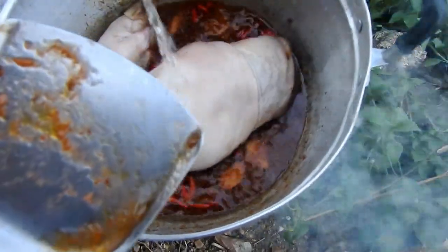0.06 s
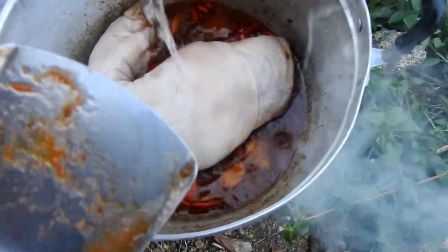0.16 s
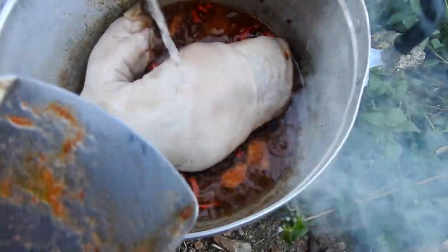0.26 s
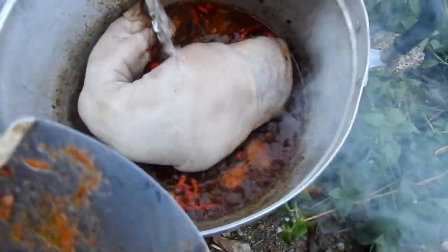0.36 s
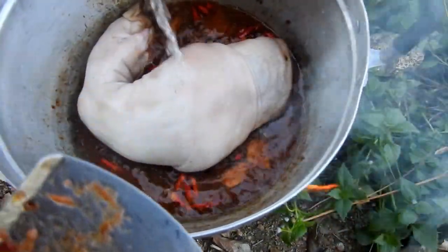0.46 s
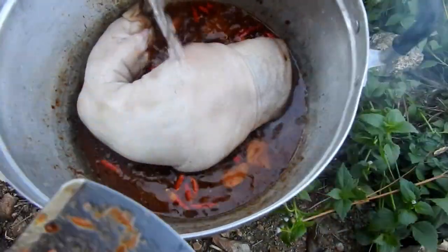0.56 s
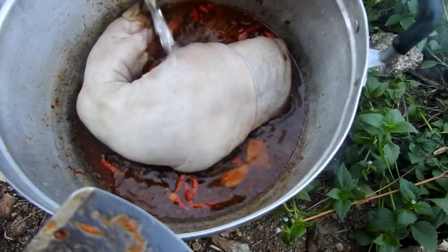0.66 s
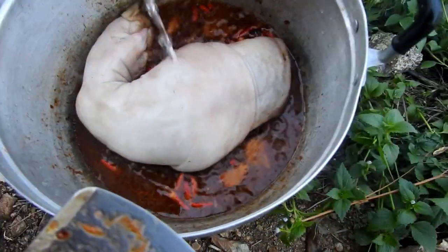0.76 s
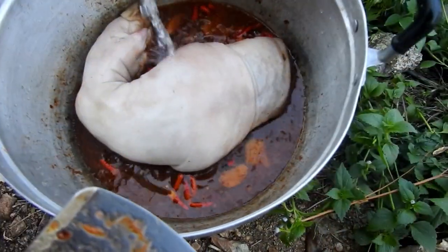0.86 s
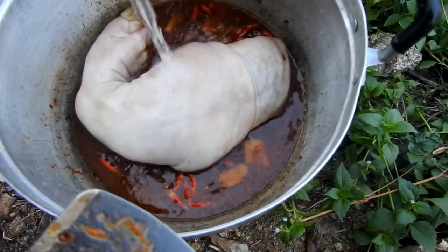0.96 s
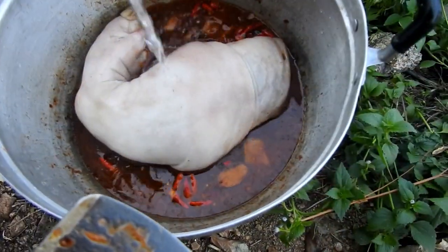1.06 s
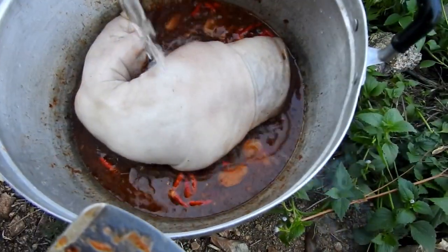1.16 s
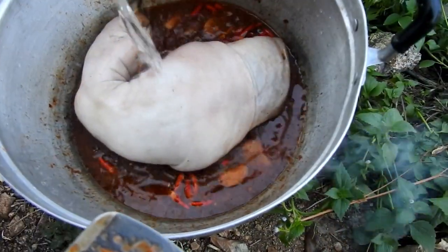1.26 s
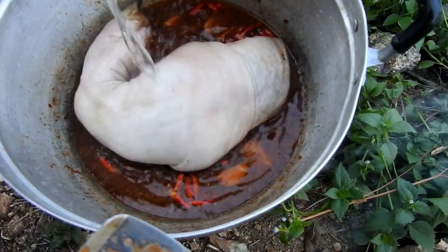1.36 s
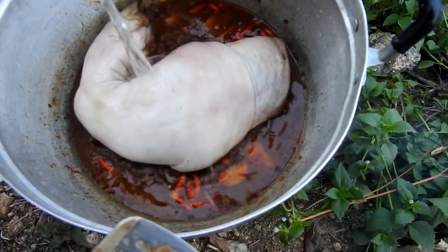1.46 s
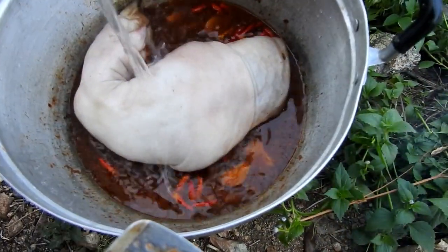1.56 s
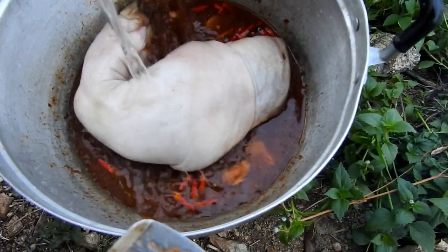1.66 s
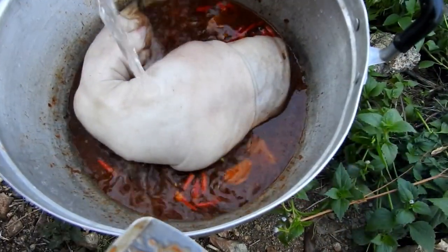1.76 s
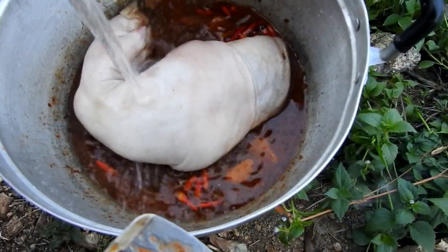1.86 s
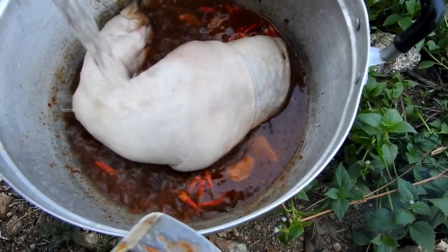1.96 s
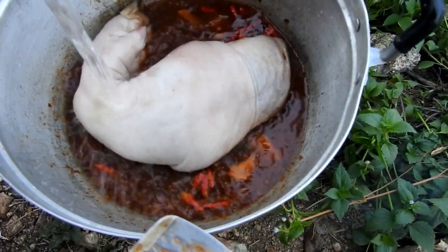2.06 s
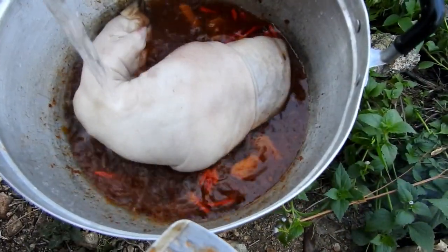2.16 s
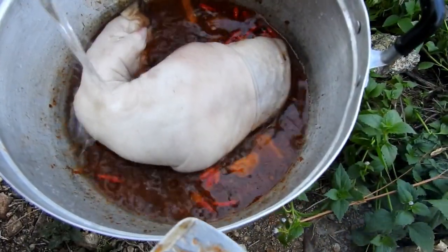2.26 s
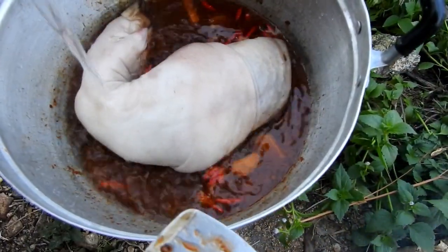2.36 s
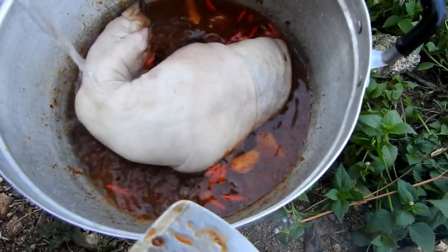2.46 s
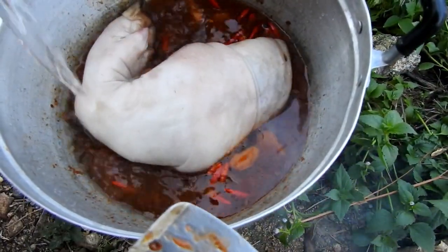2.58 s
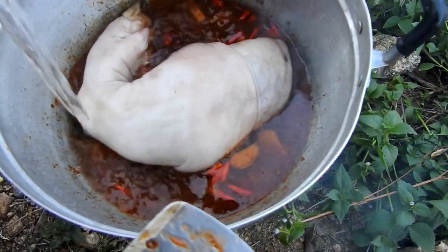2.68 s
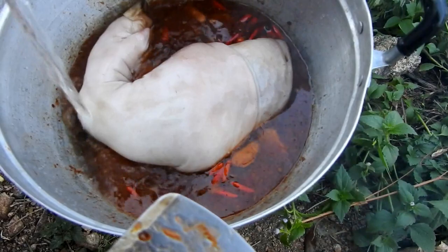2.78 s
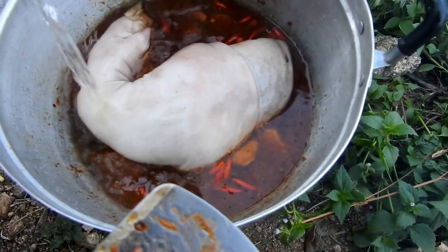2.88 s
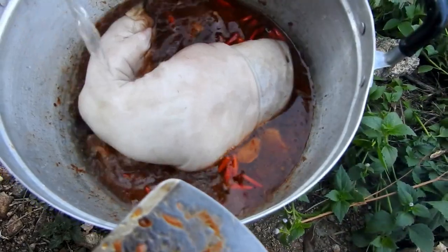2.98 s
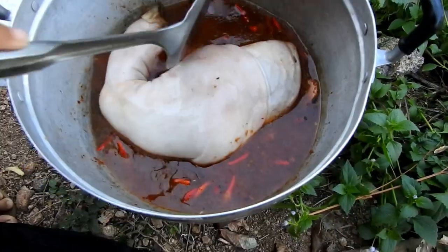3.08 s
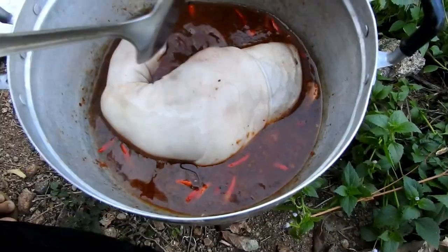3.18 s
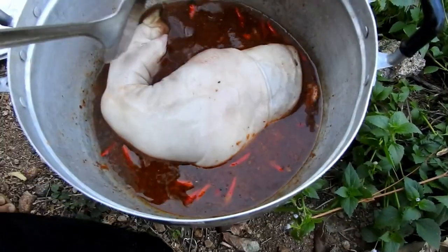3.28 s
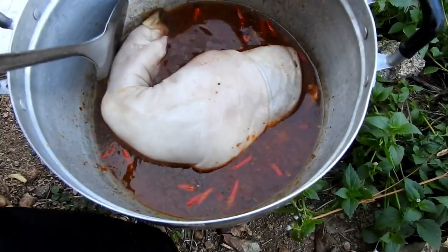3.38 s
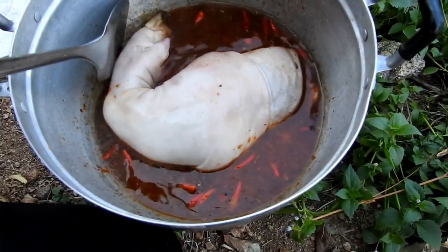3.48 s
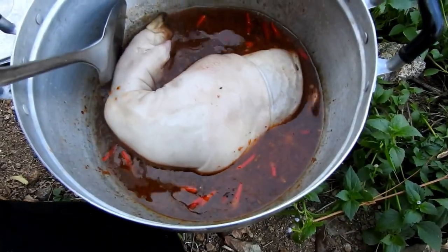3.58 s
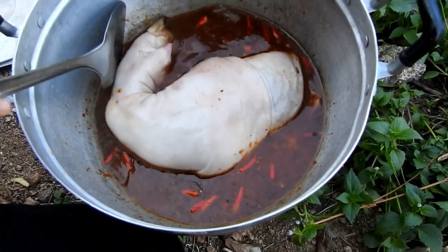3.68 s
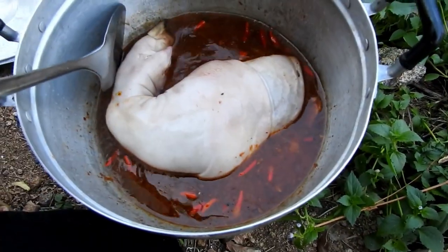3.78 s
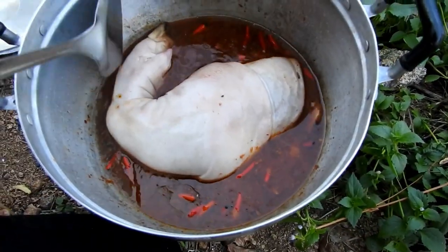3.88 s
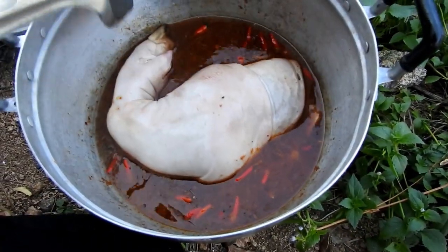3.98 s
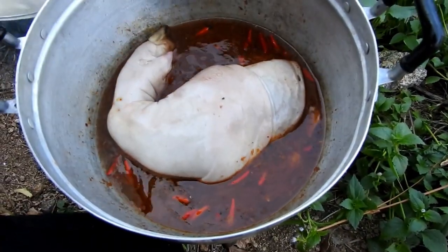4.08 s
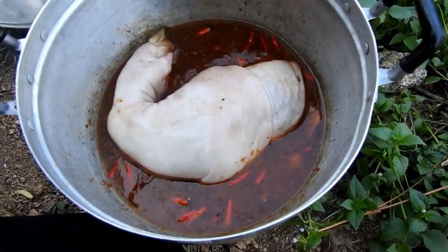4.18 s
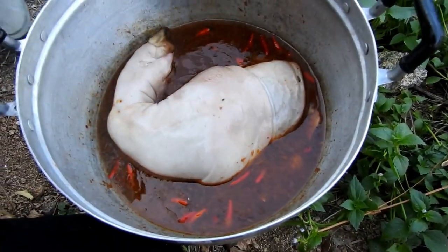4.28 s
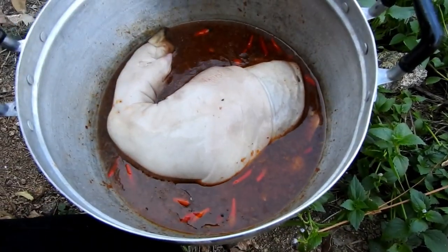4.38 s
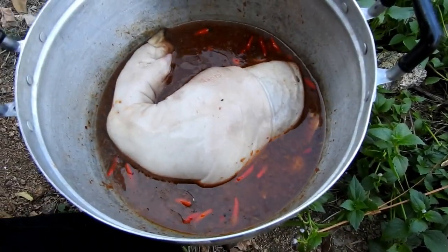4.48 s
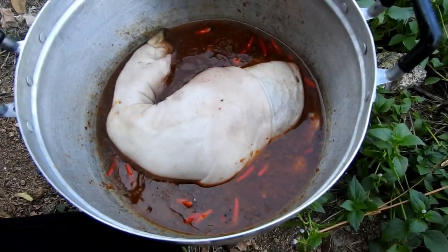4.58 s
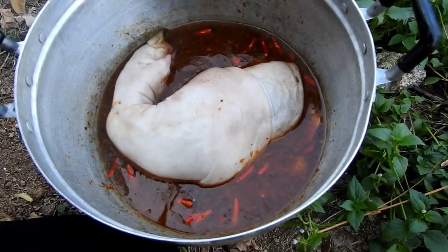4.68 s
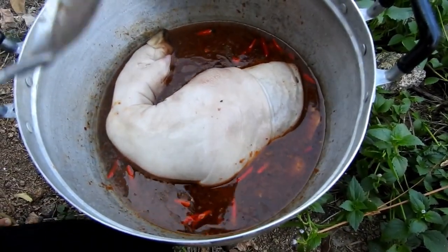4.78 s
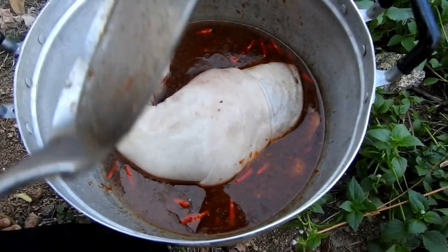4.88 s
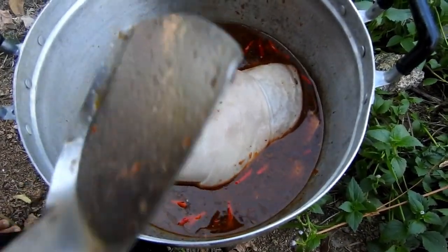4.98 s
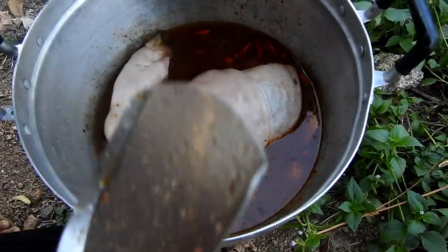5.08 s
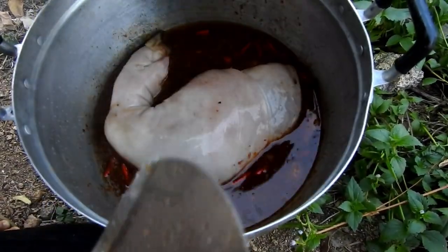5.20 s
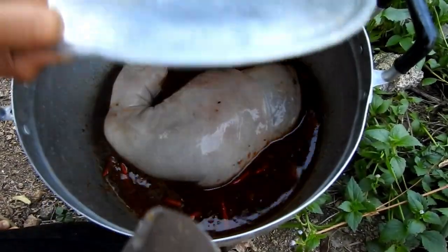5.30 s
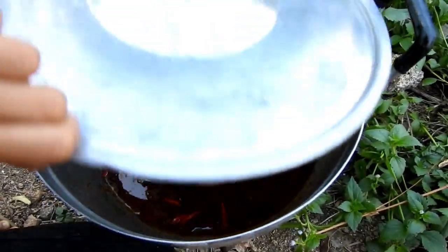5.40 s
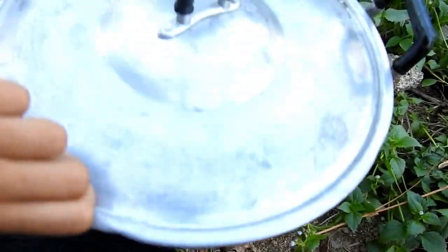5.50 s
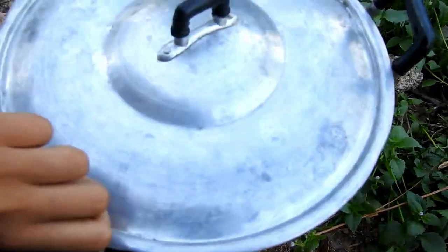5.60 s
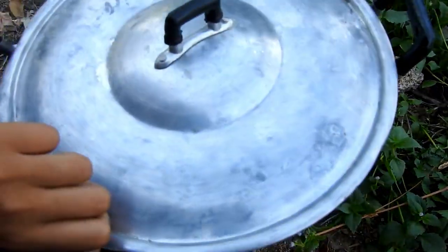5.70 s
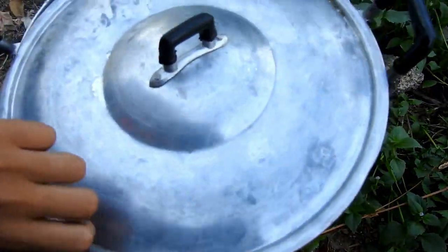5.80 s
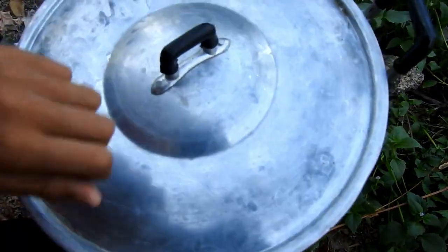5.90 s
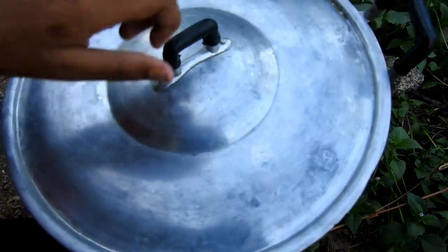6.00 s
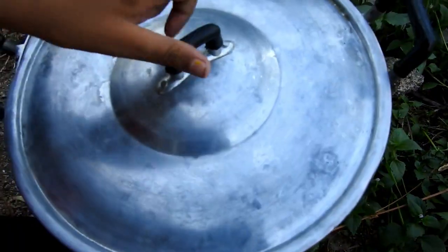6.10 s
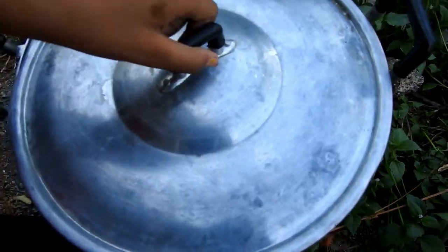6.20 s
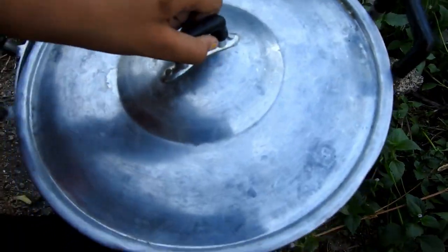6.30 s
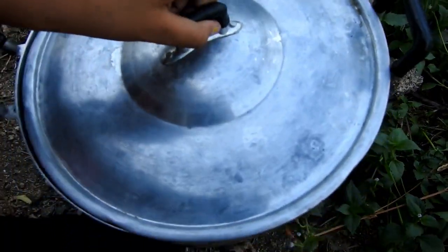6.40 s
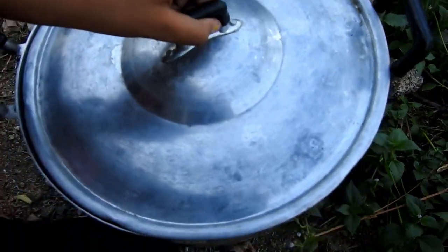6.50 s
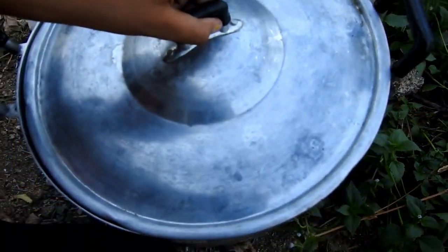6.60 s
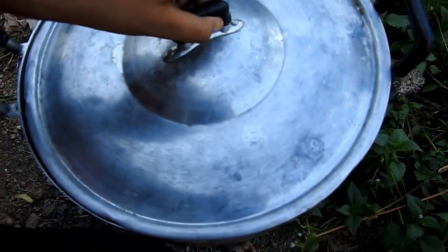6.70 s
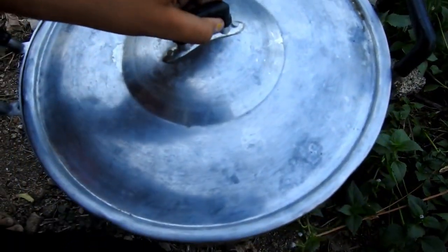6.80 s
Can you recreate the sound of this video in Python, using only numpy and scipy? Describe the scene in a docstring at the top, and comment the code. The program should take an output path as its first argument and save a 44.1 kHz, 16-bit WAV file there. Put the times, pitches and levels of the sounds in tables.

```python
"""First one hears a thin stream of water poured over meat into a big aluminium pot of broth, swelling to a splash.
After a short silence a metal spoon clinks and scrapes on the pot wall, then the lid drops on and slides into place.
Something like a distant engine throbs under a soft hiss and a few faint bird whistles.
Water is a crowd of short rising tones, one per bubble; metal is clicks and noise that set decaying modes ringing;
the engine is a row of bass puffs, the hiss is shaped noise and the whistles are gliding sine tones."""
import sys
import numpy as np
from scipy import signal
from scipy.fft import rfft, irfft, next_fast_len
from scipy.io import wavfile
from scipy.ndimage import uniform_filter1d

SR = 44100
rng = np.random.default_rng(int(sys.argv[2]) if len(sys.argv) > 2 else 0)


def file_out(sig):
    """Save sig as 16-bit WAV at sys.argv[1]."""
    # one column per channel
    cols = np.atleast_2d(sig).T
    # limit, then scale
    lim = np.clip(cols, -1, 1)
    pcm = np.round(lim * 32767).astype(np.int16)
    wavfile.write(sys.argv[1], SR, pcm)


N = 302085
TIME = np.arange(N) / SR  # seconds

# the short silence after the splash: start_s, end_s
MUTED_S = (2.856, 3.103)
# tones in which the pot rings: pitch_hz, level_db, t60_s (time to fade by 60 dB)
POT_MODES = [(386, 1.5, 0.11), (840, -4.5, 0.12), (974, -13, 0.16), (1237, 3.5, 0.092), (1508, -8.5, 0.1),
             (2120, 0.5, 0.074), (2520, -5.5, 0.085), (2820, 0.5, 0.051), (3240, 4, 0.031),
             (4000, -7, 0.18), (4250, -21, 0.072), (4840, -14, .08)]
# low tones in which the lid booms: pitch_hz, level_db, t60_s
LID_BOOM_MODES = [(278, -9.5, 0.078), (313.7, -1.5, 0.14), (350, -2, 0.018)]
# higher tones in which the lid rings: pitch_hz, level_db, t60_s
LID_MODES = [(463, -3.5, 0.2), (510, 0, 0.1), (552, -9.5, 0.42), (635, -8, 0.027), (808, -4, 0.2),
             (949, 7.5, 0.083), (998, -4, 0.63), (1015, -2, 0.27), (1203, -8.5, 0.5), (1294, -17, 0.9),
             (1377, -6.5, 0.43), (1516, 4.5, 0.079), (1515, -17, 0.083), (1610, -30, 0.41),
             (1694, -15.5, 0.37), (1944, -8, 0.26), (2280, -15, 0.079), (2710, -13, 0.21),
             (2990, -36.5, .12), (3630, -9, 0.11), (4400, -19, 0.17)]
# the lid hits the rim: start_s, blow_db, hardness_db (hard contact trades thud for clank)
LID_BLOWS = [(5.214, -7.5, 6.5), (5.29, -10.5, 5.5), (5.382, -25, 21.5), (5.508, -12, -4.5),
             (5.58, -20.5, -8.5), (5.667, -20, -7.5), (5.678, -22.5, -6.5), (5.792, -10, 1),
             (5.808, -12, -1), (5.872, -8.5, 5.5), (5.91, -16, 9.5), (5.983, -18, 4), (6.021, -13, 3.5),
             (6.129, -13, 5), (6.223, -9.5, 2.5), (6.272, -10.5, 4.5), (6.398, -9.5, 0), (6.429, -18, -2),
             (6.477, -15, -1)]


def from_db(db):
    """Turn decibels into a factor."""
    return 10 ** (np.asarray(db) / 20)


def rms_one(x):
    """Scale a sound to an average (rms) level of 1."""
    return x / np.sqrt(np.mean(x ** 2) + 1e-20)


def gains(rows):
    """Turn the level columns of a timed table into factors over time."""
    s, *columns = np.transpose(rows)
    return [from_db(np.interp(TIME, s, column)) for column in columns]


def band(x, low_hz, high_hz, order=2):
    """Keep only the pitches between two limits."""
    limits = [low_hz, min(high_hz, .45 * SR)]
    return signal.sosfilt(signal.butter(order, limits, "band", fs=SR, output="sos"), x + 1e-18)


def colour(x, spectrum):
    """Make each pitch louder or softer along a smooth curve of (Hz, dB) points."""
    size = next_fast_len(x.shape[-1])
    hz, db = np.transpose(spectrum)
    bins = np.maximum(np.fft.rfftfreq(size, 1 / SR), 1)
    curve = from_db(np.interp(np.log(bins), np.log(hz), db))
    return irfft(rfft(x, size) * curve, size)[..., :x.shape[-1]]


def stereo(pair):
    """Turn a middle and a side sound into left and right; the treble is wider than the bass."""
    # side against middle: pitch_hz, level_db
    width = [(30, -14), (70, -31), (120, -21.5), (320, -20.5), (600, -17.5), (1100, -12), (2500, -10),
             (5000, -8), (12000, -2.5)]
    middle, side = pair
    return middle + colour(side, width) * [[1], [-1]]


def add(out, s, sound):
    """Mix a sound in from a given second on."""
    at = max(int(s * SR), 0)
    out[:, at:at + sound.shape[-1]] += sound[..., :max(N - at, 0)]


def steady(x, window_s):
    """Even out the slow level to about rms 1, keeping the grain."""
    power = uniform_filter1d(x ** 2, max(int(window_s * SR), 1))
    power = uniform_filter1d(power, max(int(window_s * SR / 2), 1))
    return x / np.sqrt(np.abs(power) + 1e-12)


def during(start, end, ramp_s):
    """A switch that is open between start and end, with soft edges."""
    return np.clip(np.minimum(TIME - start, end - TIME) / ramp_s + .5, 0, 1)


def drift(per_s):
    """A random wandering of spread about 1; after 1000 points it holds its last value."""
    return np.interp(TIME * per_s, np.arange(1000), 1.2 * rng.standard_normal(1000))


def grains(per_s, spread_db):
    """Random clicks of uneven size as middle and side: each comes from a place of its own."""
    sizes = from_db(spread_db * np.minimum(rng.exponential(1, N), 4))
    happens = rng.random(N) < per_s / SR
    clicks = happens * sizes * rng.choice([-1, 1], N)
    return np.array([clicks, clicks * rng.standard_normal(N)])


def ring(x, modes):
    """Each click sets every mode ringing, like a struck metal body with its own set of fading tones."""
    out = 0
    for k, (hz, db, t60) in enumerate(modes):
        r = from_db(-60 / (t60 * SR))  # what is left after one sample
        w = 2 * np.pi * hz / SR
        tone = signal.lfilter([0, np.sin(w)], [1, -2 * r * np.cos(w), r * r], x + 1e-18)
        out = out + (-1) ** k * from_db(db) * tone  # neighbours start in opposite directions
    return out


def sheet(x, spectrum, t60, count=5):
    """Thin metal has countless high modes; as the contact moves, other ones answer with a short shimmer."""
    t = TIME[:SR // 6]
    out = 0.26 * x
    for place in range(count):
        tail = rng.standard_normal((2, len(t))) * from_db(-60 * t / t60)
        tail /= np.sqrt(np.sum(tail ** 2, axis=1, keepdims=True))
        near = np.maximum(np.cos(2 * np.pi * (TIME * 2.3 + place / count)), 0) ** 2
        out = out + signal.oaconvolve(x * near, tail, axes=1)[:, :N]
    return colour(out, spectrum)


def burst(low_hz, high_hz, t60, order=3):
    """A crowd of modes in one band, struck together: noise that dies away."""
    t = TIME[:SR // 4]
    fading = rng.standard_normal((2, len(t))) * from_db(-60 * t / t60)
    pair = band(fading, low_hz, high_hz, order)
    # middle and side each start at the same strength, taken over the first fortieth of a second
    return stereo(pair / np.std(pair[:, :SR // 40], axis=1, keepdims=True))


def late_treble(tick_db):
    """The delayed bright part of a blow: a sharp tick and a sizzle."""
    sizzle = burst(4580, 7130, t60=0.041)
    return sizzle + from_db(tick_db) * burst(3300, 8800, t60=0.011, order=2)


def sing(force, hz, t60, waver=.002):
    """Friction feeds one mode: it swells while rubbed and rings out afterwards."""
    r = from_db(-60 / (t60 * SR))
    swell = signal.lfilter([1 - r], [1, -r], force + 1e-18)
    turns = hz * np.cumsum(1 + waver * drift(70)) / SR
    return np.sqrt(2) * swell * np.sin(2 * np.pi * turns)


def from_left(x, lead_s, spread):
    """A source on the left reaches that microphone sooner and louder; spread keeps a share of its scatter."""
    # left over right: pitch_hz, level_db
    left_tilt = [(200, 0.5), (1300, 2), (2400, 4.5), (4400, 0.2), (8000, 1.6)]
    mid = x.mean(axis=0)
    left, right = mid + spread * (x - mid)
    size = next_fast_len(N + 64)
    delay = np.exp(-2j * np.pi * np.fft.rfftfreq(size, 1 / SR) * lead_s)
    late = irfft(rfft(right, size) * delay, size)[:N]
    louder = [(hz, db / 2) for hz, db in left_tilt]
    softer = [(hz, -db / 2) for hz, db in left_tilt]
    return np.array([colour(left, louder), colour(late, softer)])


def garden():
    """Soft outdoor hiss is shaped noise; each bird whistle is a sine that glides, swells and fades."""
    # colour of the hiss: pitch_hz, level_db
    air_spectrum = [(25, -24), (60, -1), (100, 3), (200, -6.5), (310, -11.5), (480, -12.5), (1000, -17),
                    (2000, -23.5), (3200, -23.5), (5000, -22.5), (6600, -17), (8000, -30), (10000, -43.5),
                    (16000, -57.5)]
    # bird whistles: start_s, length_s, start_hz, end_hz, level_db
    bird_whistles = [(3.27, 0.052, 2850, 3270, -42), (3.327, 0.16, 3470, 3300, -48),
                     (3.535, 0.072, 2400, 1850, -42.5), (4.05, 0.028, 3100, 3650, -41),
                     (4.993, 0.06, 2950, 3170, -40.5)]
    air = colour(rng.standard_normal((2, N)), air_spectrum)
    out = stereo(from_db(-38) * air / np.std(band(air[0], 170, 14000)))
    for s, length, start_hz, end_hz, db in bird_whistles:
        along = np.linspace(0, 1, int(length * SR))
        phase = 2 * np.pi * np.cumsum(start_hz * (end_hz / start_hz) ** along) / SR
        add(out, s, from_db(db) * np.sin(np.pi * along) * np.sin(phase))
    return out


def engine(per_s=27.2, jitter_s=0.0023, uneven_db=3.0, weak_db=-4.0):
    """A far engine idles: strong and weak puffs in turn, of which only the bass carries."""
    # loudness over time: start_s, level_db
    engine_level = [(0, -34), (1.5, -38), (3.0, -37), (4.6, -33), (6.0, -34.5), (6.85, -28.5)]
    puffs = np.zeros((2, N))
    for k, (late, size) in enumerate(rng.standard_normal((220, 2))):
        puff_db = size * uneven_db + weak_db * (k % 2)
        add(puffs, k / per_s + late * jitter_s, from_db([puff_db]))
    throb = ring(puffs, [(109.2, 5.2, 0.17), (160.2, 4.5, 0.083)])
    return gains(engine_level)[0] * rms_one(band(throb, 92, 206))


def pot_bumps():
    """A nudge makes the full pot thump and knock: two short bursts of low noise."""
    # soft bumps: start_s, level_db
    nudges = [(0.682, -35.5), (3.767, -26.5), (3.826, -27.5)]
    out = np.zeros((2, N))
    for s, db in nudges:
        thump = burst(236, 444, t60=0.14)
        knock = from_db(-4.5) * burst(340, 1370, t60=0.063)
        add(out, s, from_db(db) * (thump + knock))
    return out


def spoon_clinks(delay_s=0.025, clank_follows=1.41):
    """Each tap cracks, thuds and rings the pot, clanking more when hard; it starts dull, its sizzle follows."""
    # the spoon taps the pot: start_s, blow_db, sizzle_db
    taps = [(3.118, -40.5, -48), (3.165, -33.5, -48), (3.318, -41, -34), (3.416, -18, -4.5),
            (3.594, -29.5, -7.5), (3.656, -32.5, -15.5), (3.765, -31.5, -42), (3.804, -34.5, -38),
            (3.823, -31, -33), (3.849, -30, -9), (3.957, -33.5, -7.5), (4.144, -39.5, -24.5),
            (4.184, -33.5, -45), (4.298, -30.5, -9.5), (4.495, -48, -19)]
    out, touches, cracks = np.zeros((3, 2, N))
    for s, db, sizzle_db in taps:
        thud = from_db(db - 3.0) * burst(290, 1410, t60=0.089)
        clank = from_db(clank_follows * db + 7.0) * burst(1240, 3460, t60=0.058)
        add(out, s, thud + clank)
        # the bright sizzle comes later after harder taps; delay_s holds for a blow of 0 dB
        late_s = delay_s * from_db(db) ** (1 / 3)
        add(out, s + late_s, from_db(sizzle_db - 12.0) * late_treble(tick_db=-15))
        add(touches, s, from_db([db]))
        add(cracks, s + 0.0027, from_db([db]))
    return out + from_db(-11.5) * ring(touches, POT_MODES) + from_db(21) * band(cracks, 360, 4200)


def spoon_strokes():
    """The edge catches on the wall thousands of times a second; pot and spoon ring on afterwards."""
    # spoon strokes: start_s, end_s, grit_db, pot_ring_db, spoon_ring_db
    strokes = [(3.439, 3.483, -20.5, -20, -65), (3.602, 3.616, -20.5, -24.5, -23),
               (3.668, 3.67, -22.5, -23, -37), (3.849, 3.92, -17, -32, -39),
               (3.906, 3.971, -13.5, -39.5, -18.5), (4.148, 4.28, -35.5, -52, -56),
               (4.289, 4.379, -25, -41, -51), (4.362, 4.44, -27.5, -44, -69)]
    # tones in which the spoon rings: pitch_hz, level_db, t60_s
    spoon_modes = [(1040, -17.5, 0.44), (1714, -1, 0.44), (1830, -18, 0.68), (2364, -13.5, 0.53),
                   (3779, -13, 0.21), (6100, -26, 0.33), (7100, -13, 0.3), (8800, -28, 0.23)]
    # colour of the scraping: pitch_hz, level_db
    scrape_spectrum = [(1180, -29), (2000, -14), (2120, -22), (2200, -14), (2700, -12), (3150, -6.5),
                       (3520, -7), (4720, -6), (6370, 0.5), (7770, -14.5), (15600, -53)]
    grit, wall, handle = np.zeros((3, N))
    for start, end, grit_db, pot_db, spoon_db in strokes:
        press = during(start, end, ramp_s=0.027)
        grit += from_db(grit_db) * press
        wall += from_db(pot_db) * press
        handle += from_db(spoon_db) * press
    slips = rms_one(grains(2200, spread_db=0.0))
    slips *= from_db(1.3 * drift(170))
    out = from_db(10.5) * sheet(slips * grit, scrape_spectrum, t60=0.067)
    out += 1.15 * ring(slips * wall, POT_MODES) / np.std(ring(slips[0, :SR], POT_MODES))
    spoon_ring = sum(from_db(db) * sing(handle, hz, t60, waver=0.00017) for hz, db, t60 in spoon_modes)
    return stereo(out) + spoon_ring


def pressure_db():
    """Each push of the hand sets in, holds and lets go; the hand then rests on the lid."""
    # pushes along the pot: start_s, end_s, pressure_db, attack_db_per_s, release_db_per_s
    hand_pushes = [(5.214, 5.545, -1, 2500, 216), (5.802, 6.329, 1, 550, 296), (6.378, 6.495, 0, 601, 416)]
    pushes = []
    for start, end, db, attack, release in hand_pushes:
        before, after = np.maximum(start - TIME, 0), np.maximum(TIME - end, 0)
        pushes.append(db - attack * before - release * after)
    return np.maximum(np.max(pushes, axis=0), -25)  # the resting hand


def squeals():
    """The rubbing locks on to a single mode of the pot (first two, under the spoon) or of the lid, which sings."""
    # squeals: start_s, end_s, pitch_hz, level_db
    squeal_list = [(4.138, 4.151, 1000, -22), (4.288, 4.323, 1012, -30.5), (5.234, 5.356, 1390, -24.5),
                   (5.4, 5.572, 1497, -25), (5.43, 5.614, 812, -24), (5.653, 5.716, 811, -25),
                   (5.874, 5.94, 1003, -20), (6.074, 6.326, 312.3, -23), (6.376, 6.51, 268.4, -25),
                   (6.434, 6.501, 1366, -22.5), (6.775, 6.778, 962, -7.5)]
    out = 0
    for start, end, hz, db in squeal_list:
        rubbing = during(start, end, ramp_s=0.0047)
        out = out + from_db(db) * sing(rubbing, hz, t60=0.17, waver=.015)
    return out


def lid_slide(boom_db=-38, boom_rise_db=18, clang_db=-21.5, clang_rise_db=2.5,
              grit_db=-15.5, grit_rise_db=-3.0, grit_follows=1.08, dulling_db=0.5):
    """The rim judders over the pot's edge and hisses; as the lid covers the pot it booms more and hisses less."""
    # from first touch until the lid covers the pot: start_s, end_s
    seating_s = (5.2, 6.33)
    # colour of the hiss: pitch_hz, level_db
    hiss_spectrum = [(1000, -40), (1700, -8.5), (2420, -12), (2600, 3), (2800, -32), (2940, -1.5),
                     (3190, -6.5), (4710, -2), (5030, -2), (6520, 2.5), (9890, -25), (15600, -59)]
    # boom, clang and grit all follow the hand's pressure
    press_db = pressure_db()
    covered = np.interp(TIME, seating_s, [0, 1])
    boom = from_db(press_db + boom_db + boom_rise_db * covered ** 2)
    clang = from_db(press_db + clang_db + clang_rise_db * covered)
    grit = from_db(grit_follows * press_db + grit_db + grit_rise_db * covered)

    judder = grains(260, spread_db=9.5)
    # while only its edge touches, the lid sounds higher; this fades as it slides over the pot
    tilt_db = np.interp(TIME, [5.4, 5.52], [7.0, 0])
    edge_hz = 1900  # the pitch favoured then
    modes = 0
    for mode in LID_MODES:
        closeness = max(1 - 2 * abs(np.log2(mode[0] / edge_hz)), -1)
        # the moving contact favours now one mode, now another
        favour = from_db(8.0 * drift(10) + tilt_db * closeness)
        modes = modes + ring(judder * favour, [mode])
    out = boom * steady(ring(judder, LID_BOOM_MODES), 0.067) + clang * steady(modes, 0.038)
    rattle = band(grains(500, spread_db=1.5), 380, 1370)
    out += from_db(-3.0) * clang * steady(rattle, 0.042)

    rough = sheet(grains(1800, spread_db=3.5), hiss_spectrum, t60=0.22)
    # the rough rim makes the hiss flutter and shift its colour
    edges = np.geomspace(1500, 15000, num=9)
    hiss = 0
    for low, high in zip(edges, edges[1:]):
        duller_db = dulling_db * covered * (low > edges[5])
        hiss = hiss + band(rough, low, high) * from_db(1.43 * drift(45) - duller_db)
    hiss = steady(hiss, 0.047) * from_db(1.76 * drift(160))
    for s, db, hard_db in LID_BLOWS:
        # right after a heavy thud the hiss drops out for about 10 ms
        if db - hard_db > -15:
            hiss *= 1 - 0.9 * during(s, s + 0.01, ramp_s=0.0011)
    return stereo(out + grit * hiss) * (TIME > seating_s[0])


def lid_knocks(treble_delay_s=0.011, treble_db=-13):
    """The lid drops and rocks on the rim: each blow cracks, thuds, clanks and rings the lid; its treble is late."""
    out, touches, thuds = np.zeros((3, 2, N))
    press_db = pressure_db()
    for s, db, hard_db in LID_BLOWS:
        thud_db, clank_db = db - hard_db, db + hard_db
        thud = from_db(thud_db - 5.5) * burst(254, 1010, t60=0.069)
        clank = from_db(clank_db - 17) * burst(1200, 2880, t60=0.064)
        add(out, s, thud + clank)
        # the treble follows about 10 ms later, strongest while the lid is pushed
        late_s = s + treble_delay_s
        push_db = press_db[int(late_s * SR)]
        add(out, late_s, from_db(db + treble_db + push_db) * late_treble(tick_db=-12.5))
        add(touches, s, from_db([db]))
        add(thuds, s + 0.00204, from_db([thud_db]))
    ringing = from_db(-12) * ring(touches, LID_MODES) + from_db(-4) * ring(thuds, LID_BOOM_MODES)
    return out + ringing + from_db(13.0) * band(thuds, 360, 4100)


def bubble(hz, cycles, rise, tail, lag_s=0):
    """One bubble swells and dies within some cycles, rising in pitch as it nears the surface."""
    t = TIME[:SR // 30]
    age = t * hz / cycles
    shape = age ** 2 * np.exp(1 - age ** 2) + tail * (1 - np.exp(-age)) * np.exp(-age / 3)
    return shape * np.sin(2 * np.pi * hz * (t + lag_s) * (1 + rise * np.minimum(age, 8)))


def bubbles(per_s, low_hz, high_hz, cycles, spread_db, count=20):
    """A cloud of bubbles born at random, each at the pitch of its size."""
    clicks = grains(per_s * (TIME < MUTED_S[1]), spread_db)
    out = np.zeros((2, N))
    pitches = np.geomspace(low_hz, high_hz, num=count)
    sizes = [bubble(hz, cycles, rise=0.0059, tail=0.96) for hz in pitches]
    dealt = rng.integers(0, count, N)
    for at in np.flatnonzero(clicks[0]):
        add(out, at / SR, clicks[:, at, None] * sizes[dealt[at]])
    return stereo(steady(out, 0.064))


def plinks(cycles=4.03, pan_db=-1.5, lag_s=.00001, count=3):
    """The loudest bubbles, each from its own spot in the pot, shed a few smaller ones right after."""
    # small bubbles, then large ones: start_s, level_db, pitch_hz (before a slight common shift)
    loud_bubbles = [(0.0014, -8.5, 6570), (0.366, -16, 6900), (0.6419, -17, 6700), (0.7687, -13.5, 6240),
                    (0.9801, -7, 6540), (1.0086, -3.5, 6540), (1.078, -9.5, 6300), (1.29, -17.5, 5530),
                    (1.3653, -12.5, 6300), (1.4326, -27, 7050), (1.447, -7, 6830), (1.5218, -11, 6600),
                    (1.6103, -13, 6320), (1.6415, -7, 6560), (1.71, -5.5, 7000), (1.7337, -10.5, 6600),
                    (1.7878, -4.5, 7160), (1.8398, -3.5, 6600), (2.04, -9.5, 6300), (2.208, -8.5, 7430),
                    (2.365, -4, 5800), (2.4758, -8, 6700), (2.6319, -4, 5960), (2.7237, -5, 5770),
                    (2.7924, -9.5, 6050), (0.1496, -16, 4630), (0.613, -22.5, 4310), (1.0071, -6.5, 4640),
                    (1.0176, -10, 4100), (1.3324, -21.5, 3420), (1.5344, -21, 4370), (1.5888, -14.5, 4960),
                    (1.7779, -13.5, 4200), (1.8672, -8, 4970), (1.8704, -8.5, 5000), (1.9101, -8.5, 4670),
                    (1.9284, -23.5, 1950), (2.0053, -19, 3410), (2.0837, -20, 3770), (2.1186, -18, 3520),
                    (2.4443, -16.5, 2610), (2.4628, -18, 2870), (2.4872, -19.5, 3050),
                    (2.6184, -11.5, 4680)]
    out, sides = np.zeros((2, N)), np.array([[1], [-1]])
    chance = rng.standard_normal((len(loud_bubbles), 3))
    shed = rng.random((len(loud_bubbles), count, 2))
    for (s, db, hz), (pan, lag, life), followers in zip(loud_bubbles, chance, shed):
        gain = from_db(db - 2.0 + sides * pan * pan_db / 2)
        lifetime = cycles * np.exp(0.092 * life)
        main = bubble(0.994 * hz, lifetime, rise=0.0057, tail=0.94, lag_s=sides * lag * lag_s)
        add(out, s, gain * main)
        for delay, size in followers:
            small = bubble(hz * (.75 + 0.56 * size), cycles, rise=0.012, tail=1.0)
            add(out, s + 0.0016 + 0.011 * delay, gain * from_db(-11.5) * small)
    return out


def pour(clump_db=1.5):
    """More flow makes more and bigger bubbles in clumps; droplets tick on the surface and merge into a splash."""
    # strength of the stream, swelling to the closing splash: start_s, level_db
    stream = [(0, -33.5), (0.3, -59.5), (0.9, -43), (1.42, -40.5), (1.64, -28.5), (1.9, -25.5),
              (1.98, -35.5), (2.33, -26.5), (2.58, -30.5), (2.66, -20.5), (2.84, -17)]
    # bubbles by size: low_hz, high_hz, trickle_per_s, more_per_s (at full flow), cycles,
    # spread_db, splash_level_db, gain_db_per_s (rise on the way to the splash)
    bubble_clouds = [(7200, 9800, 250, 1800, 4.0, 3, -31, -6),
                     (3870, 7600, 250, 2000, 4.9, 8.5, -2.5, -0.5),
                     (2440, 3900, 150, 1500, 6.2, 4.5, -4, 11.5),
                     (1133, 2300, 200, 900, 1.8, 5, -6.5, 28.5), (337, 1105, 150, 600, 2.2, 4, -10.5, 48.5)]
    spray, = gains(stream)
    flow = spray / spray.max()
    # the stream digs in ever deeper, so big bubbles gain on small ones until the splash
    to_splash_s = np.maximum(2.896 - TIME, 0)
    water = 0
    for low_hz, high_hz, trickle_per_s, more_per_s, cycles, spread_db, db, db_per_s in bubble_clouds:
        cloud = bubbles(trickle_per_s + more_per_s * flow, low_hz, high_hz, cycles, spread_db)
        cloud_db = db - db_per_s * to_splash_s + clump_db * drift(28.1)
        water = water + spray * from_db(cloud_db) * cloud
    patter = colour(grains(1500 + 6000 * flow, spread_db=7.0),
                    [(500, -30.5), (1300, -30.0), (6500, 6.5), (10000, -17.5), (15000, -29.5)])
    water += from_db(-3.0) * spray * stereo(steady(patter, .2))
    ticks = band(grains(200 + 700 * flow, spread_db=10.5), 3800, 9740, order=3)
    water += from_db(-34.5) * flow ** 0.29 * stereo(steady(ticks, 0.35))
    return water * (TIME < np.mean(MUTED_S))


def scene():
    """Water and spoon sit on the left; everything else is close to the middle."""
    water = from_left(pour() + plinks(), lead_s=0.000015, spread=0.6)
    spoon = from_left(spoon_clinks() + spoon_strokes(), lead_s=0.000019, spread=0.65)
    rest = pot_bumps() + lid_slide() + lid_knocks() + squeals() + engine() + garden()
    return water + spoon + rest * from_db([[.3], [-.3]])


def rumble_suppressor(x, onset_db=-17, corner_hz=140):
    """Sustained loud sound makes the recorder turn its bass down."""
    r = np.exp(-1 / (.07 * SR))  # the loudness is averaged over about 0.07 s
    power = signal.lfilter([1 - r], [1, -r], band(x[0], 250, 2500) ** 2)
    share = power ** 2 / (power ** 2 + from_db(onset_db) ** 4)
    thin = signal.sosfilt(signal.butter(1, corner_hz, "high", fs=SR, output="sos"), x)
    return x + share * (thin - x)


def record(dry):
    """The bass gives way under loud sound, peaks are rounded, the sound cuts out briefly, the top is cut."""
    x = rumble_suppressor(dry)
    rounded = x / (1 + x ** 6) ** (1 / 6)
    live = np.maximum(1 - during(*MUTED_S, ramp_s=.006), from_db(-62))
    top_cut = signal.ellip(12, .1, 70, 15800, fs=SR, output="sos")  # nothing much above 15800 Hz
    return signal.sosfilt(top_cut, rounded * live)


dry = scene()
out = record(dry)
file_out(out)
```